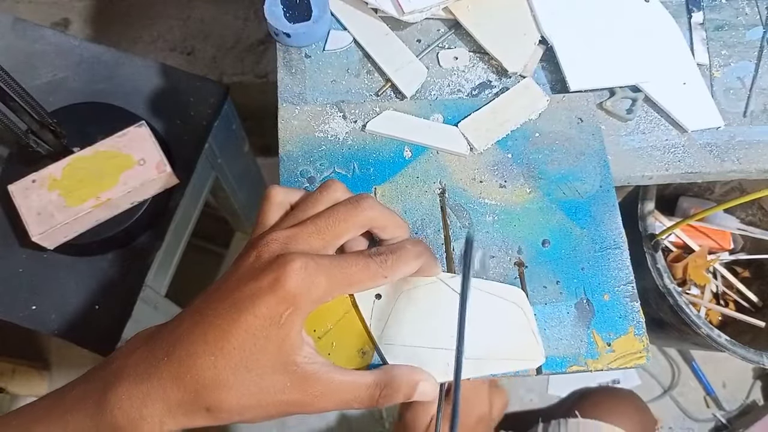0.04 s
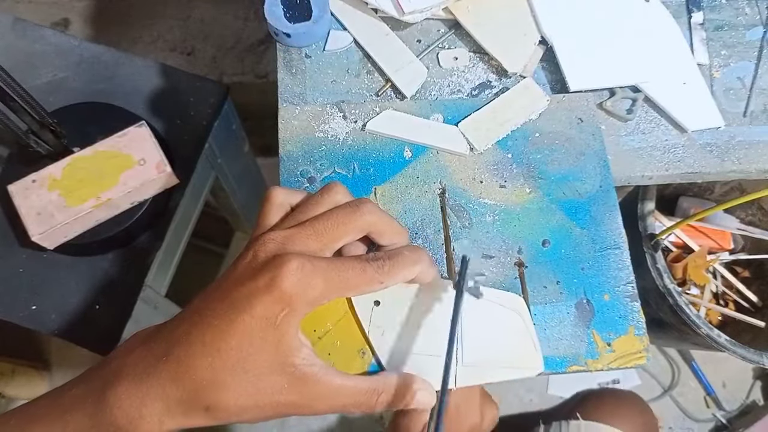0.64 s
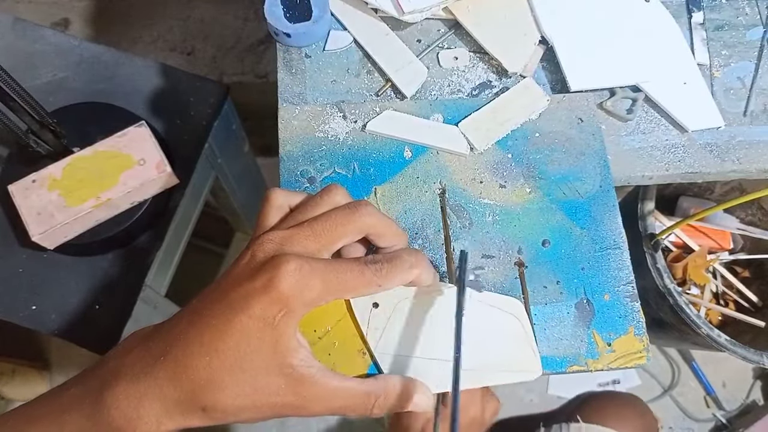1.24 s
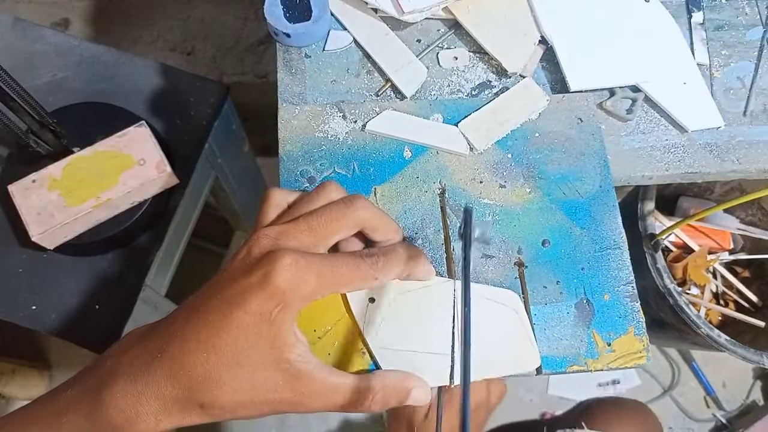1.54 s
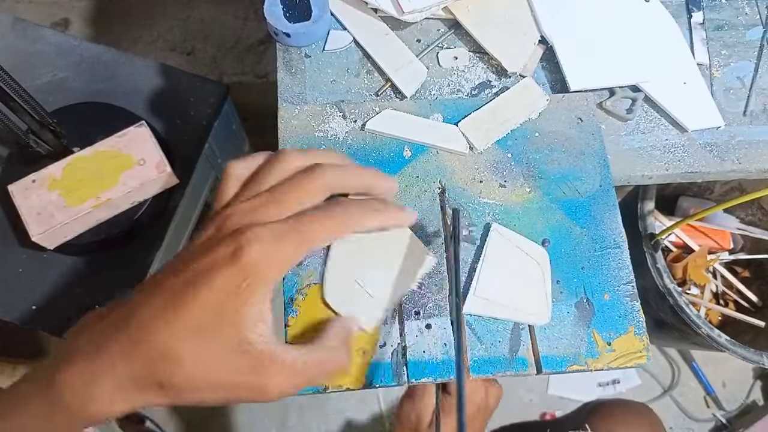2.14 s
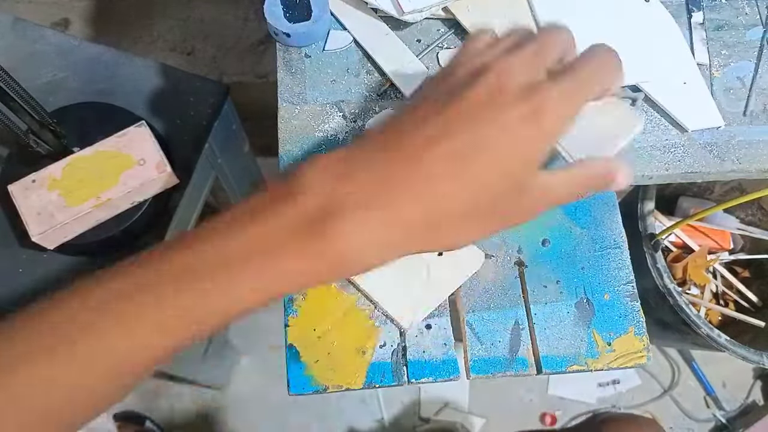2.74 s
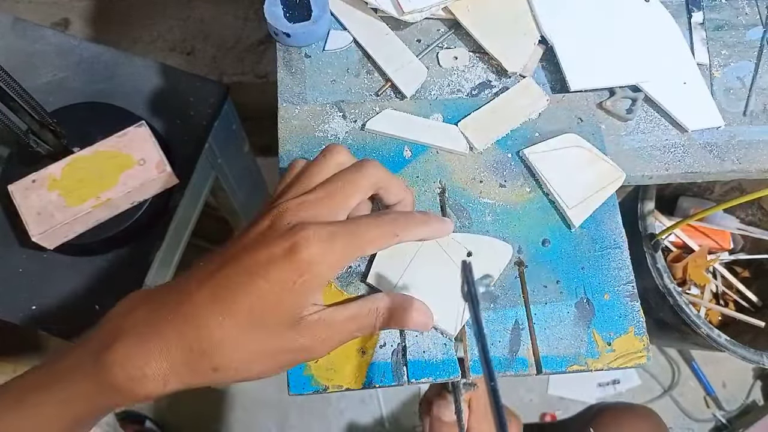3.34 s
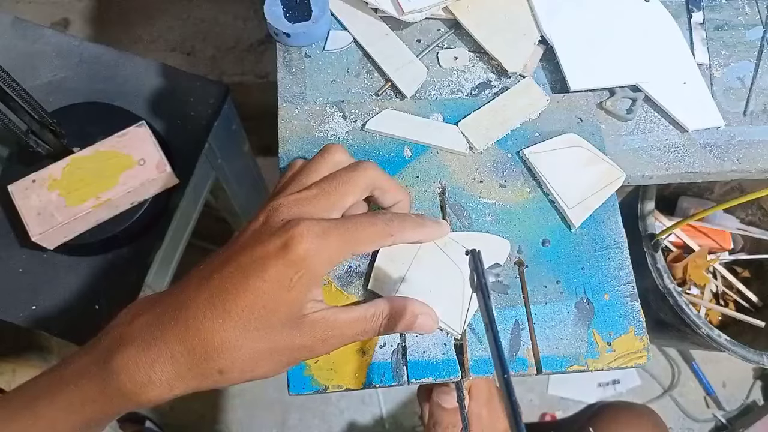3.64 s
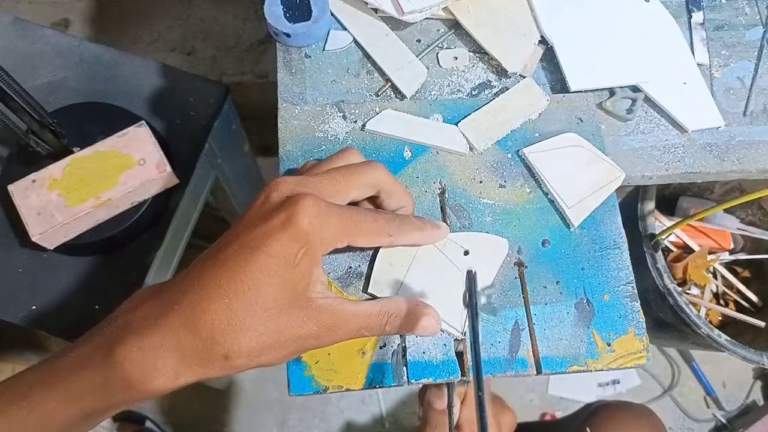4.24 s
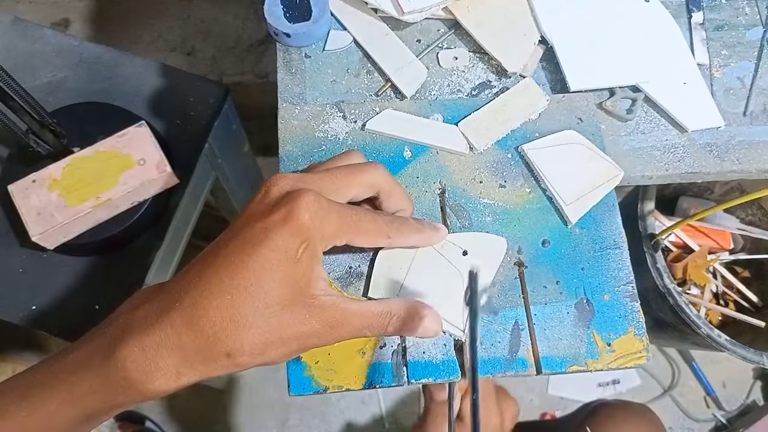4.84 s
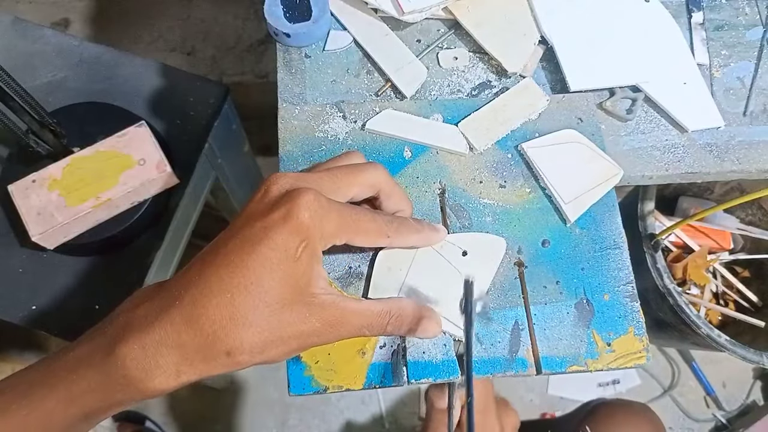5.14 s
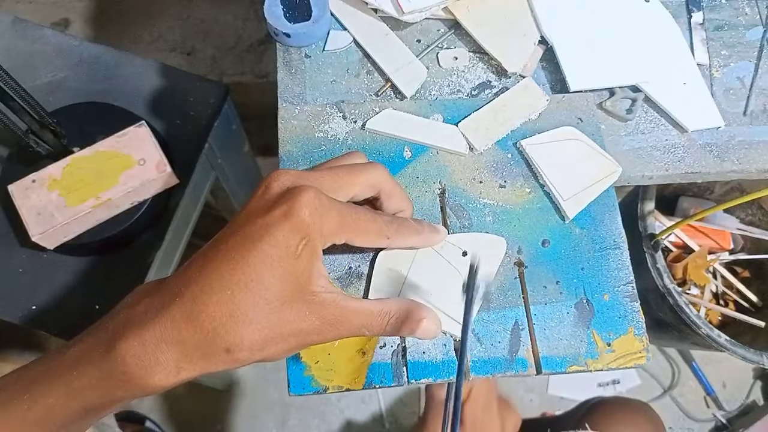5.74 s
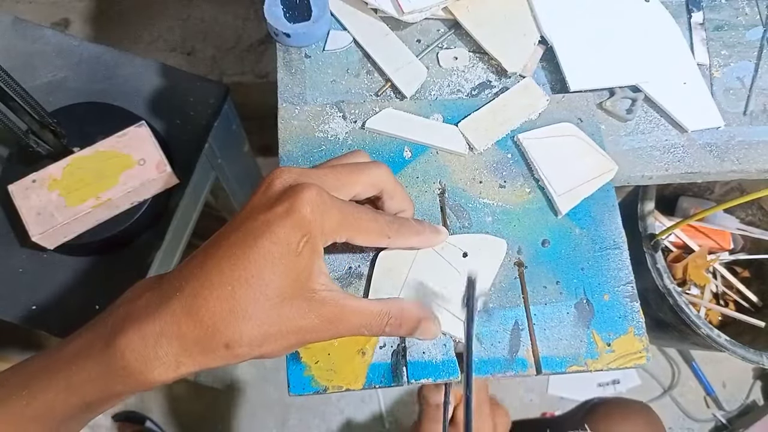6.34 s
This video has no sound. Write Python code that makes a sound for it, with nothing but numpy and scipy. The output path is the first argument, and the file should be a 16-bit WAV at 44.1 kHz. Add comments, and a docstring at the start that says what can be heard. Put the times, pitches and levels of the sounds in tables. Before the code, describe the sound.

Rapid strokes of a fine-toothed saw cut plastic sheet in a small workshop, pausing as pieces snap off and clatter, with one rooster crow behind.

```python
"""In a small workshop, a fine-toothed hand saw cuts a thin plastic sheet held on a board.
With each quick push and pull the teeth tear off chips, so the sheet rasps and the board shakes.
The cut-off piece snaps free, the pieces clatter, and one is tossed onto the bench.
The saw is set down on the sheet with soft bumps, and a second cut begins.
Outside, a rooster crows once and insects keep up a thin hiss."""
import sys
import numpy as np
from scipy import signal
from scipy.fft import rfft, irfft, next_fast_len
from scipy.io import wavfile
from scipy.ndimage import map_coordinates

SR = 44100
rng = np.random.default_rng(int(sys.argv[2]) if len(sys.argv) > 2 else 0)


def output_pcm(signal):
    """Save a mono or channel-first signal as 16-bit PCM at the path in sys.argv[1].

    Samples are clipped to [-1, 1] before scaling.
    """
    pcm = np.clip(np.atleast_2d(signal).T, -1, 1) * 32767
    wavfile.write(sys.argv[1], SR, np.round(pcm).astype(np.int16))


N = 291060
SHEET_TURNED_S = 3  # strokes after this time belong to the second cut

# The sheet's tone (how strong each pitch is) in each cut: pitch_hz, level_db
FIRST_CUT_TONE = [(220, -45), (380, 4), (444, -2), (495, 1.5), (626, -8.5), (842, -2.5), (1410, -6.5),
                  (1700, -0.5), (3070, -4.5), (3700, -9), (4260, -1.5), (4610, -6), (5730, -9.5),
                  (6600, -19), (12000, -32.5), (15800, -36)]
SECOND_CUT_TONE = [(220, -63), (380, -24), (488, 10), (636, 0), (910, 1), (1210, 0.5), (1600, 2),
                   (1990, -4.5), (2150, -9), (2510, -8), (4260, -8.5), (5560, -13), (6300, -24.5),
                   (9740, -27), (15800, -44.5)]
# Pitches at which sheet and blade ring in the second cut: pitch_hz, width_hz, boost_db
SECOND_CUT_RINGS = [(496, 16, 0), (839, 37, 5.5), (928, 72, 4), (1112, 13, 8.5), (1610, 24, 3),
                    (1914, 48, 2.5), (2000, 49, 6), (2530, 53, 1.5), (3136, 60, 3.5), (4050, 115, 3.5)]
# The low tone of the board under the sheet: pitch_hz, level_db
BOARD_TONE = [(25, -26.5), (85, -36), (132, -26.5), (150, -20.5), (175, -10.5), (200, -14.5), (230, -3),
              (275, 1.5), (305, -4.5), (350, -32.5), (420, -15), (700, -68)]


def amp(db):
    """Turn decibels into a number to multiply by."""
    return 10 ** (np.asarray(db) / 20)


def unit(x):
    """Scale a signal to an average power of 1."""
    return x / np.sqrt(np.mean(x ** 2) + 1e-20)


def along(points, hz):
    """Read between (pitch_hz, value) points, with octaves evenly spaced."""
    pitches, values = np.transpose(points)
    return np.interp(np.log(hz + 1), np.log(pitches + 1), values)


def clock():
    """The time of every sample, in seconds."""
    return np.arange(N) / SR


def wobble(rate, size=N):
    """A smooth curve through `rate` random values a second."""
    points = rng.standard_normal(int(size * rate / SR) + 4)
    return map_coordinates(points, [np.arange(size) * rate / SR])


def swell(time_s, half_s):
    """A bell-shaped rise and fall around time_s."""
    near = np.arange(max(0, int((time_s - 4 * half_s) * SR)), min(N, int((time_s + 4 * half_s) * SR)))
    bell = np.zeros(N)
    bell[near] = np.exp(-((near / SR - time_s) / half_s) ** 2)
    return bell


def body(tone, rings=(), low_hz=1, high_hz=SR, size=8192):
    """How an object answers one tap: a broad tone plus ringing pitches, from low_hz to high_hz."""
    hz = np.fft.rfftfreq(size, 1 / SR) + 1
    peaks = 1 + sum(amp(db) ** 2 / (1 + (2 * (hz - pitch) / width) ** 2) for pitch, width, db in rings)
    band = 1 / (1 + (low_hz / hz) ** 16) / (1 + (hz / high_hz) ** 16)
    gain = amp(along(tone, hz)) * np.sqrt(peaks * band)
    # these steps keep the tone but put all the ringing after the tap
    cepstrum = irfft(np.log(np.maximum(gain / gain.max(), 1e-5)))
    cepstrum[1:size // 2] *= 2
    cepstrum[size // 2 + 1:] = 0
    response = irfft(np.exp(rfft(cepstrum)))
    return response / np.linalg.norm(response)


def contact_spot(low_hz, high_hz, fade_s, ring_db, count):
    """A tap with random ringing pitches: every spot that is touched rings differently."""
    t = np.arange(SR // 12) / SR
    hz = rng.uniform(low_hz, high_hz, (count, 1))
    decay = amp(-60 * t / fade_s)
    response = amp(ring_db) * 2 * decay / decay.sum() * np.cos(2 * np.pi * hz * t).sum(axis=0)
    response[0] += 1
    return response / np.linalg.norm(response)


def through(x, response):
    """Play a signal through an object or a room."""
    return signal.oaconvolve(x, response)[:len(x)]


def noise(tone):
    """Steady noise with the given tone."""
    return through(rng.standard_normal(N), body(tone))


def outdoor_air():
    """A quiet rush of air whose level drifts a little."""
    # The air's tone: pitch_hz, level_db
    air_tone = [(25, -24), (60, -24), (100, -15), (140, -5), (284, -5), (500, -7), (880, -7.5), (1870, -14),
                (4000, -15), (5400, -17), (7000, -22), (10000, -31.5), (15800, -61)]
    return amp(-58.5) * noise(air_tone) * amp(wobble(3.13))


def insects():
    """Insects make a thin, high hiss that flickers slightly."""
    # Their narrow band of sound: pitch_hz, level_db
    insect_tone = [(3600, -73), (4200, -43), (4380, 2), (4600, -11), (4850, 4), (5020, -17.5), (5250, -21),
                   (6000, -50.5)]
    return amp(-56 + wobble(22.63)) * noise(insect_tone)


def strokes():
    """List every push and pull of the saw, followed by how its teeth bite."""
    # Pushes, about 6.5 a second, and the lighter pulls between them (speed 1 is a brisk stroke):
    # fastest_moment_s, half_length_s, top_speed, level_db
    pushes = [(.119, .018, 1.03, -25.5), (.26, 0.023, 0.97, -23.5), (.412, 0.021, 1.08, -22),
              (.577, 0.021, 0.96, -24), (.728, 0.02, 1.01, -22.5), (.888, 0.019, 1.08, -23.5),
              (1.039, 0.019, 0.95, -19.5), (1.197, 0.017, 0.96, -19.5), (1.353, 0.017, 1.12, -23),
              (1.512, .015, 1, -27.5), (1.67, 0.027, 0.69, -39), (1.836, 0.026, 0.71, -37),
              (2.003, 0.017, 0.48, -34.5), (2.102, 0.021, 0.74, -27.5), (2.226, 0.022, 0.91, -43.5),
              (4.072, .018, 0.46, -27.5), (4.287, 0.022, 0.76, -25.5), (4.449, 0.024, 0.67, -28),
              (4.596, 0.024, 1.01, -28.5), (4.746, 0.019, 1.06, -25.5), (4.889, 0.02, .9, -25),
              (5.043, .018, .7, -27.5), (5.193, 0.02, 0.98, -25.5), (5.336, 0.023, 0.93, -26.5),
              (5.5, 0.022, 0.96, -26.5), (5.647, 0.019, .85, -22.5), (5.791, 0.02, 0.98, -23),
              (5.946, 0.019, .85, -21), (6.094, 0.024, 0.81, -23), (6.25, .021, 0.78, -22.5),
              (6.397, .018, .85, -22), (6.545, 0.028, .7, -21.5)]
    pulls = [(.035, .019, 0.52, -27.5), (.21, .02, 0.41, -22), (.346, .018, 0.97, -31),
             (.511, 0.015, 0.74, -30.5), (.656, .014, 0.73, -29), (.819, .02, 0.74, -26.5),
             (.971, .019, 0.68, -25), (1.127, .019, 1.08, -25), (1.285, .015, 0.99, -26),
             (1.435, .019, 0.81, -26), (1.584, 0.015, 0.89, -32.5), (1.76, .035, 0.98, -46),
             (1.925, .04, .7, -42.5), (4.22, 0.011, 0.35, -43.5), (4.382, 0.022, 0.51, -29.5),
             (4.52, .018, 0.76, -32), (4.675, .025, 0.49, -33), (4.81, .028, .4, -30.5),
             (4.966, 0.028, 0.39, -29), (5.117, 0.029, 0.32, -29.5), (5.275, .027, 0.27, -28.5),
             (5.417, .025, 0.45, -30.5), (5.579, .029, 0.51, -30), (5.722, .028, .4, -28),
             (5.876, .027, 0.42, -27), (6.027, .02, 0.41, -29), (6.181, .024, 0.57, -30),
             (6.332, .03, 0.42, -32), (6.489, 0.019, 0.55, -27.5)]
    # How the teeth bite, one row for each cut (levels are added to the stroke's own):
    # edge_db, judder_db, catch_speed, judder_growth_db_per_half_length
    push_bite = [(2.2, 3.8, 0.47, -.5), (2.5, 4, 0.58, -3.5)]
    pull_bite = [(-0.01, 0.5, 0.31, 1), (-0.86, 1, 0.35, -0.62)]
    return [(*row, *bite[int(row[0] > SHEET_TURNED_S)])
            for rows, bite in ((pushes, push_bite), (pulls, pull_bite)) for row in rows]


def glide(half_lengths):
    """The blade speeds up and slows again: its share of top speed, which it reaches at 0."""
    return np.exp(-np.abs(half_lengths / np.where(half_lengths < 0, 1.02, .98)) ** 1.38)


def teeth(speed, tooth_hz, scatter_db, chip_share, snag_db):
    """Each tooth tears off a chip: a tick and a puff of noise, more often when the blade is fast."""
    size = len(speed)
    teeth_passed = np.cumsum(tooth_hz * (speed + .12) * np.exp(.12 * wobble(150, size))) / SR
    tooth = teeth_passed.astype(int)
    bite = amp(scatter_db * rng.standard_normal(size))[tooth]
    ticks = np.diff(tooth, prepend=0) * bite / np.sqrt(speed + 0.034)
    chips = bite * np.exp(-1.5 * (teeth_passed % 1)) * rng.standard_normal(size)
    rasp = np.sqrt(1 - chip_share) * unit(ticks - ticks.mean()) + np.sqrt(chip_share) * unit(chips)
    return unit(rasp * amp(snag_db * wobble(128.7, size)))  # runs of teeth snag and slip together


def saw():
    """The teeth shake sheet and board: a rasp, a bright edge, and dust hiss that grows with speed."""
    # Pitches at which sheet and blade ring in the first cut: pitch_hz, width_hz, boost_db
    first_cut_rings = [(487, 21, 2.5), (795, 17, -9), (1163, 73, 6.5), (2060, 32, -12), (2374, 65, -0.5),
                       (3113, 80, 5), (3430, 94, 6.5), (4080, 35, 3), (5520, 200, 1)]
    hiss_db, hiss_growth = -9.5, 1.7
    t = np.arange(-SR // 5, SR // 5) / SR  # 0 is a stroke's fastest moment
    layers = np.zeros((3, N + SR))
    for time_s, half_s, top_speed, db, edge_db, *_ in strokes():
        shape = glide(t / half_s)
        # on a hard push the teeth skate at first, then dig in all at once
        pressure = np.clip((db + 30) / 6.5, 0, 1)
        since_dig = t + 1.02 * half_s
        dig = np.where(since_dig < 0, amp(-1), 1 + 0.48 * np.exp(-np.abs(since_dig) / 0.0061))
        snag_db = 1.71 / np.sqrt(top_speed)  # slow strokes snag more
        scrape = teeth(top_speed * shape, tooth_hz=860.5, scatter_db=1.96, chip_share=0.69,
                       snag_db=snag_db)
        spot = contact_spot(687.3, 15000, fade_s=0.074, ring_db=4, count=30)
        scrape = through(scrape * shape * dig ** pressure, spot)
        dust = scrape * np.sqrt(shape) * top_speed ** hiss_growth
        levels = amp(db + np.array([[0], [edge_db], [hiss_db]]))
        layers[:, round(time_s * SR):][:, :len(t)] += levels * [scrape, scrape, dust]
    rasp, edge, hiss = layers[:, SR // 5:][:, :N]
    sound = amp(-2) * through(rasp, body(BOARD_TONE))
    # the sheet is turned and gripped anew for the second cut, so it rings differently
    first = clock() < SHEET_TURNED_S
    cuts = (first, FIRST_CUT_TONE, first_cut_rings), (~first, SECOND_CUT_TONE, SECOND_CUT_RINGS)
    for active, tone, rings in cuts:
        sound += amp(0.42) * through(rasp * active, body(tone, rings, 411, 2110))
        sound += amp(-0.76) * through(edge * active, body(tone, rings, 2083, 7700))
        sound += amp(-0.5) * through(hiss * active, body(tone, rings, low_hz=6660))
    return sound


def judder():
    """The teeth catch as the blade passes through a slow speed, and the board shakes at a low pitch."""
    # The saw jams for an instant and jolts the board: time_s, half_length_s, level_db
    jams = [(0.229, 0.015, -18.5), (0.88, 0.0088, -18), (0.985, 0.0068, -20), (1.139, 0.008, -15.5),
            (1.453, 0.0081, -19), (1.999, 0.019, -20.5), (4.085, 0.0095, -16), (4.866, 0.016, -21),
            (6.398, 0.02, -16)]
    catch_range = 0.8  # larger lets more blade speeds shake the board
    t = np.arange(-SR // 5, SR // 5) / SR
    power = np.zeros(N + SR)
    for time_s, half_s, top_speed, db, _, judder_db, catch_speed, growth_db in strokes():
        speed = top_speed * glide(t / half_s)
        catching = np.exp(-(np.log(speed / catch_speed + 1e-9) / catch_range) ** 2)
        level = amp(db + judder_db + growth_db * t / half_s)
        power[round(time_s * SR):][:len(t)] += (level * catching) ** 2
    jam_power = sum((amp(db) * swell(time_s, half_s)) ** 2 for time_s, half_s, db in jams)
    force = np.sqrt(power[SR // 5:][:N] + jam_power)
    swing_hz = 273 * np.exp(.065 * wobble(25) + 0.0796 * wobble(110))
    swing = np.sin(2 * np.pi * np.cumsum(swing_hz) / SR)
    shudder = amp(-5.5) * unit(swing) + amp(-8.5) * noise(BOARD_TONE)
    # the sheet slaps on the board with every swing: a hollow buzz
    slaps = unit(np.maximum(swing, 0) ** 2 * rng.standard_normal(N))
    second_cut_db = -15.5 + 1.5 * (clock() - 4)  # louder as the cut deepens from 4 s on
    buzz_db = np.where(clock() < SHEET_TURNED_S, -10.5, second_cut_db)
    buzz = amp(buzz_db) * through(slaps, body(FIRST_CUT_TONE, SECOND_CUT_RINGS, 457, 1113))
    return force * (shudder + buzz)


def squeaks():
    """The blade sticks and slips on the side of the cut: loud squeaks, and chirps as strokes start."""
    # The loud squeaks: time_s, half_length_s, pitch_hz, level_db
    loud_squeaks = [(0.265, 0.015, 4335, -19.5), (2.112, 0.011, 4060, -21), (4.895, .01, 10030, -34),
                    (5.051, 0.0098, 5730, -24.5), (5.503, .011, 9370, -32), (6.489, 0.012, 2925, -24.5)]
    chirp_chance, chirp_half_s, chirp_hz = .4, 0.0029, 4150
    phase_per_hz = 2 * np.pi * (clock() + np.cumsum(0.0244 * wobble(600)) / SR)
    chirps = []
    for time_s, half_s, _, db, *_ in strokes():
        luck, length, pitch = rng.random(3)
        if luck < chirp_chance:
            hz = chirp_hz * (1 + .15 * (pitch - .5))
            chirps.append((time_s - 1.23 * half_s, chirp_half_s * (.5 + length), hz, db - 2.5))
    return sum(amp(db) * swell(time_s, half_s) * np.sin(hz * phase_per_hz)
               for time_s, half_s, hz, db in loud_squeaks + chirps)


def rooster():
    """One crow: a hoarse opening, a clear held note and a rough falling end."""
    # The course of the crow: time_s, pitch_hz, level_db, roughness (0 is clear, about 1 is hoarse)
    crow = [(0.869, 753, -60, .4), (.925, 782, -21.5, 0.27), (.97, 770, -26, 0.6), (1.02, 677.5, -37, 0.77),
            (1.1, 697, -23.5, 1.04), (1.239, 619, -38, 0.83), (1.31, 611, -26.5, 0.71),
            (1.389, 614, -28.5, 0.8), (1.44, 700, -33.5, 0.11), (1.67, 678, -31.5, 0.12),
            (1.709, 610, -31.5, 0.57), (1.758, 592.4, -30, 0.55), (1.93, 518.6, -38.5, .9),
            (1.98, 476, -70, 0.83)]
    # The overtones of each voice: multiple_of_pitch, level_db
    hoarse_overtones = [(2, 1.5), (3, -39), (4, -9), (5, -25), (6, -14)]
    clear_overtones = [(2, -6), (3, -22), (4, 3), (5, -27), (6, -27)]
    times, *columns = np.transpose(crow)
    pitch_hz, db, roughness = (np.interp(clock(), times, column) for column in columns)
    jitter = .07 * wobble(450) + .015 * wobble(60)
    phase = 2 * np.pi * np.cumsum(pitch_hz * (1 + roughness * jitter)) / SR
    hoarse, clear = (unit(sum(amp(level) * np.sin(multiple * phase) for multiple, level in overtones))
                     for overtones in (hoarse_overtones, clear_overtones))
    hoarse_share = np.clip(2 * roughness, 0, 1)
    voice = hoarse_share * hoarse + (1 - hoarse_share) * clear
    flutter = amp(3.5 * np.clip(roughness, 0, 1) * wobble(250))
    crowing = (clock() > times[0]) & (clock() < times[-1])
    return amp(db - 5) * voice * flutter * crowing


def plastic_pieces():
    """Hard little hits with a short rattle ring the loose plastic; it bounces and skids to rest."""
    # Pieces snap off or land (knock and tick are added to the level):
    # time_s, level_db, knock_db, tick_db, ring_hz, loss_per_bounce_db, skid_half_length_s
    clacks = [(1.947, -30, -27, -16, 3900, 23, 0.0048), (2.013, -20.5, -11.5, -24, 4200, 11, .004),
              (2.079, -21, -30, -28, 3940, 20, .004), (2.093, -20, -20, -30, 3940, 4, 0.0046),
              (2.145, -30.5, -32, -7, 3970, 18, 0.0045), (2.115, -21.5, -35, -17, 2320, 6, 0.012),
              (2.216, -30.5, -7, -27, 2060, 17, 0.023), (2.367, -40, -3, -14, 3430, 7, 0.024),
              (2.42, -19, -23, -6.5, 3460, 4.5, 0.024), (2.475, -20.5, -8.5, -3.5, 1135, 16, 0.0095),
              (2.562, -21, -18, -9.5, 3490, 21, 0.013), (2.593, -28.5, -17, -24, 3360, 13, .005),
              (2.713, -32, -1.5, -4, 2080, 5.5, 0.03), (2.905, -10.5, -20.5, -5.5, 3380, 5.5, .003),
              (3.074, -29, -7.5, -7.5, 3300, 17, 0.035), (3.182, -34.5, -10.5, -28, 2050, 2.5, 0.012)]
    # A loose piece's tone: pitch_hz, level_db
    tone = [(90, -49), (150, -19), (280, 0), (390, -21.5), (490, -13), (1140, -8), (1520, -14.5),
            (1960, -8), (2630, -11), (3320, -1.5), (4100, -9.5), (5600, -13.5), (8100, -23), (8900, -23.5),
            (11600, -31), (15800, -44)]
    # The pitches at which it rings: pitch_hz, width_hz, boost_db
    rings = [(1097, 19.5, 10.5), (1983, 64, 10.5), (2280, 53, 12), (3150, 88, -13), (3600, 80, -7),
             (3810, 140, -4), (3980, 240, 5.5), (5100, 150, 6.5), (6360, 146, 10), (8140, 350, 7)]
    bounce_s, skid_db = .0112, -11.5
    t = np.arange(SR // 8) / SR
    crack_and_rattle = amp(-60 * t / .008) + amp(7) * amp(-60 * t / 0.046)
    rise = 1 - np.exp(-t / 0.00057)  # the plastic gives a little when hit
    layers = np.zeros((3, N))
    for time_s, db, knock_db, tick_db, ring_hz, loss_db, _ in clacks:
        for bounce in range(3):
            hit = rng.standard_normal(len(t)) * crack_and_rattle * rise
            hit = through(hit, contact_spot(688, 11000, fade_s=0.053, ring_db=3, count=14))
            # the spot that is struck decides which pitch rings loudest
            hit = through(hit, contact_spot(ring_hz, ring_hz, fade_s=0.013, ring_db=3, count=1))
            levels = amp(db - bounce * loss_db + np.array([[knock_db + 28.5], [22.5], [tick_db + 23]]))
            start = round((time_s + bounce * bounce_s) * SR)
            layers[:, start:][:, :len(t)] += levels * hit / np.linalg.norm(hit)
    knock, clack, tick = layers
    sound = through(knock, body(tone, rings, 100, 1560))
    sound += through(clack, body(tone, rings, 1350, 4620))
    sound += through(tick, body(tone, rings, low_hz=4480))
    sliding = sum(amp(db + skid_db) * swell(time_s + 1.14 * half_s, half_s)
                  for time_s, db, *_, half_s in clacks)
    scratch = unit(rng.standard_normal(N) * amp(3.7 * wobble(400)))
    return sound + through(sliding * scratch, body(tone, rings))


def saw_bumps():
    """A soft touch of the saw thumps the board and faintly rings the sheet."""
    # The saw is set down: time_s, level_db
    touches = [(3.506, -41), (4.035, -34.5), (4.204, -39)]
    force = sum(amp(db) * swell(time_s + 0.0039, 0.00433) for time_s, db in touches)
    touch = force * rng.standard_normal(N)
    thump = amp(14) * through(touch, body(BOARD_TONE))
    ring = amp(5.5) * through(touch, body(SECOND_CUT_TONE, SECOND_CUT_RINGS, 380, 1600))
    return thump + ring


def workshop_echo(x):
    """The small room echoes, each pitch dying away at its own speed."""
    # How long the echo takes to fade by 60 dB: pitch_hz, fade_s
    fade_times = [(150, 0.18), (500, 0.19), (2000, 0.13), (6000, 0.12), (14000, 0.24)]
    hz, t, spectrum = signal.stft(rng.standard_normal(SR // 2), SR, nperseg=256)
    fade = amp(-60 * t / along(fade_times, hz)[:, None])
    _, tail = signal.istft(spectrum * fade, SR, nperseg=256)
    delay = round(.004 * SR)
    return through(x, np.pad(tail / np.linalg.norm(tail), (delay, 0)))


def scene():
    """Mix the sawing, the clatter, the outdoor sounds and the echo into one channel."""
    sawing = saw() + judder() + squeaks() + saw_bumps()
    clatter, crow = plastic_pieces(), rooster()
    echo = workshop_echo(amp(-9.5) * sawing + amp(-8.5) * clatter + amp(-2) * crow)
    return (sawing + clatter + crow + echo + outdoor_air() + insects())[None]


def record(dry):
    """The microphone input rounds off the hardest peaks; the very highest pitches are cut away."""
    ceiling, top_hz = .85, 15750
    rounded = dry / (1 + np.abs(dry / ceiling) ** 5) ** (1 / 5)
    size = next_fast_len(N + SR // 2)
    kept = np.fft.rfftfreq(size, 1 / SR) < top_hz
    return irfft(rfft(rounded, size) * kept, size)[:, :N]


dry = scene()
out = record(dry)
output_pcm(out)
```